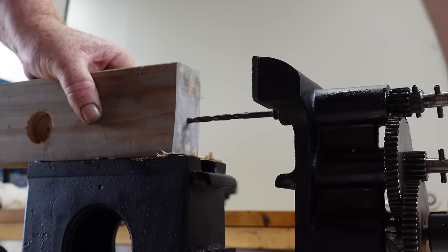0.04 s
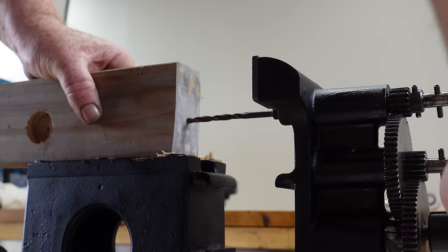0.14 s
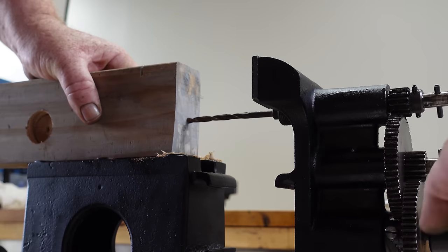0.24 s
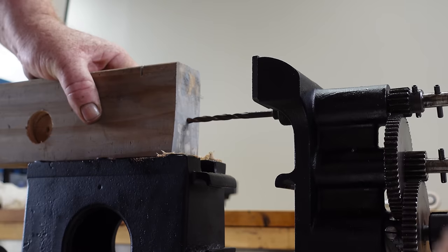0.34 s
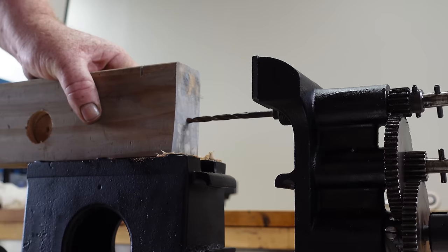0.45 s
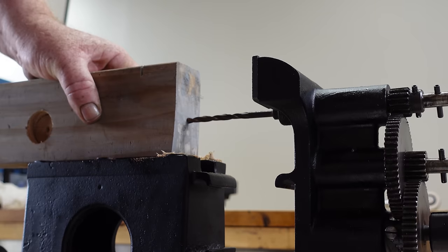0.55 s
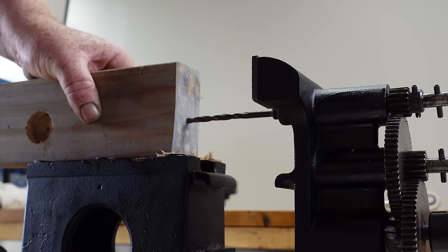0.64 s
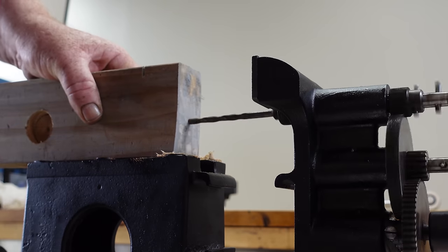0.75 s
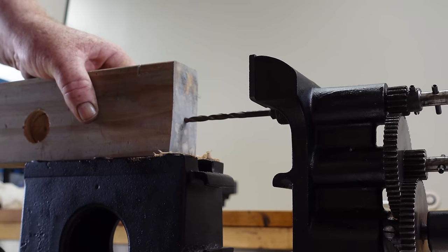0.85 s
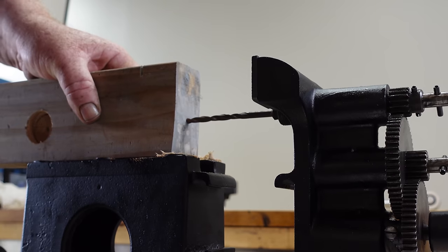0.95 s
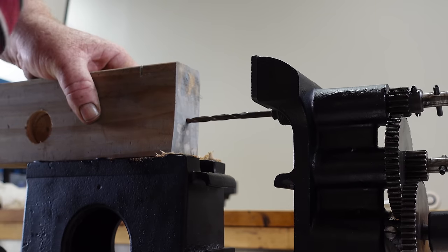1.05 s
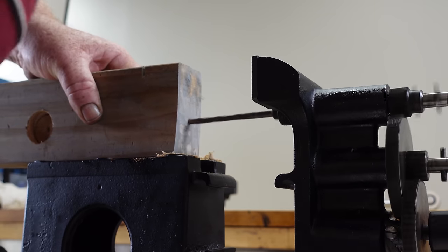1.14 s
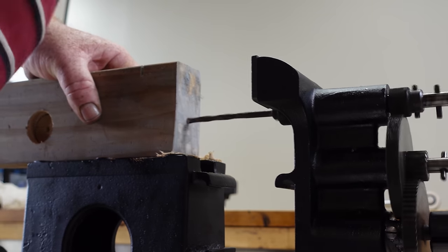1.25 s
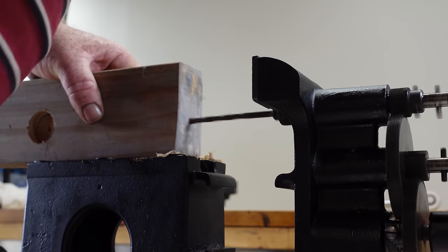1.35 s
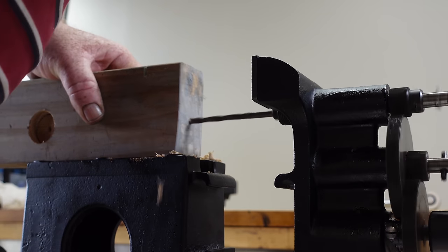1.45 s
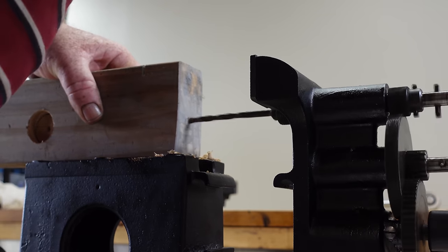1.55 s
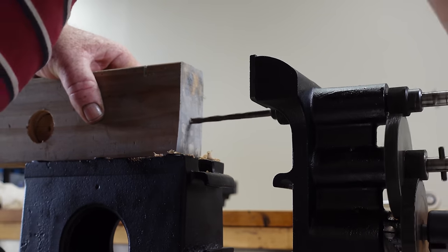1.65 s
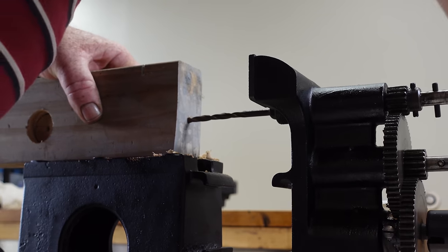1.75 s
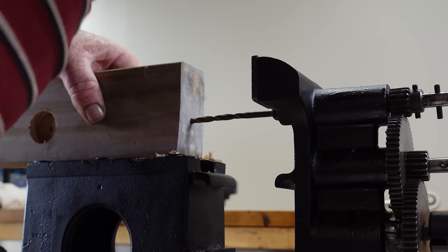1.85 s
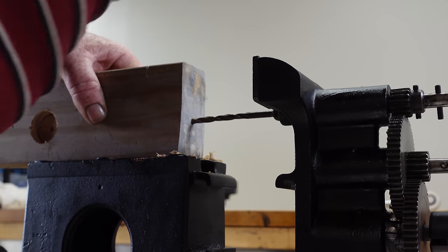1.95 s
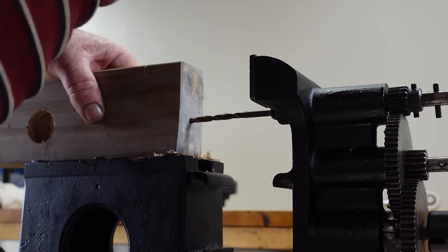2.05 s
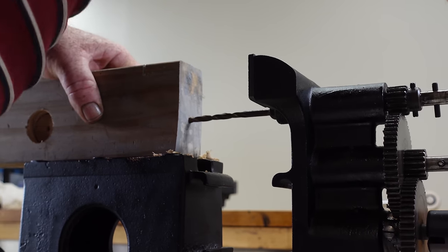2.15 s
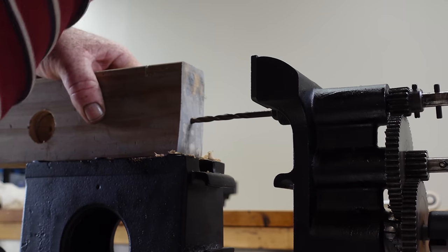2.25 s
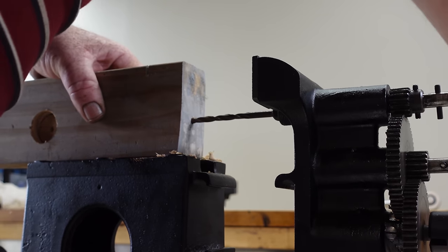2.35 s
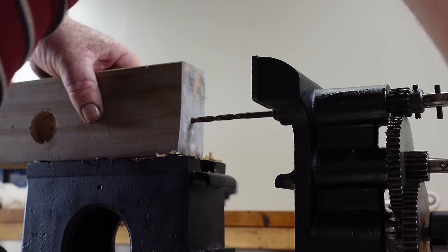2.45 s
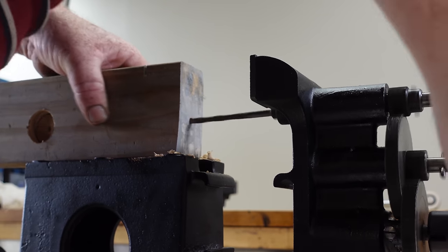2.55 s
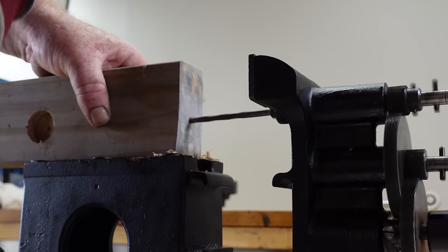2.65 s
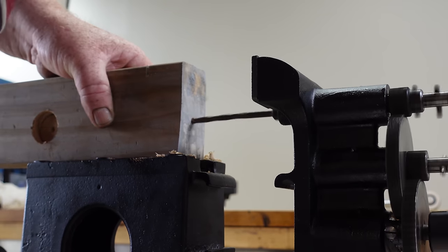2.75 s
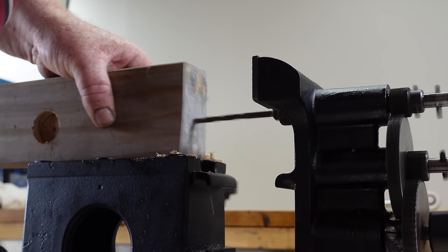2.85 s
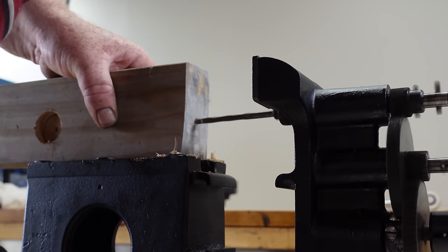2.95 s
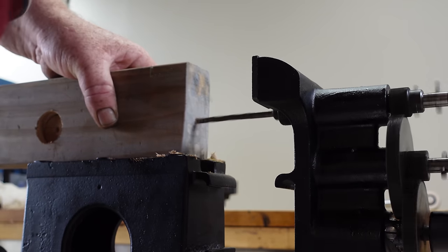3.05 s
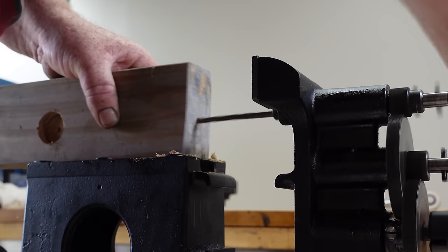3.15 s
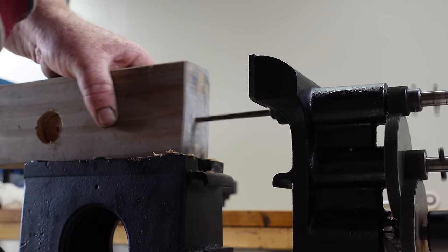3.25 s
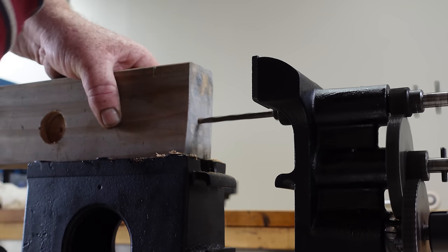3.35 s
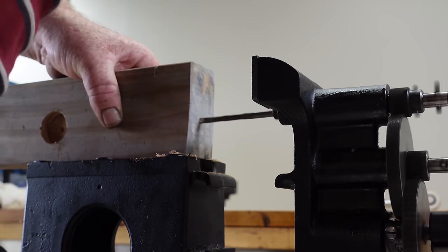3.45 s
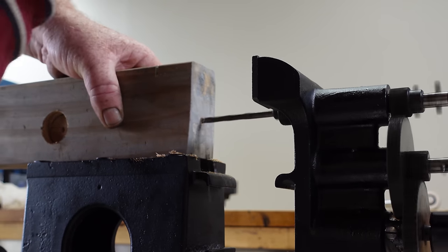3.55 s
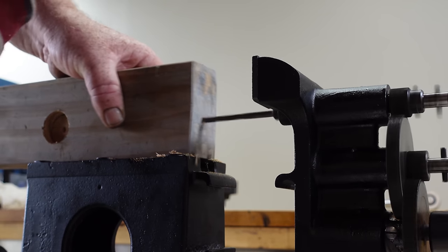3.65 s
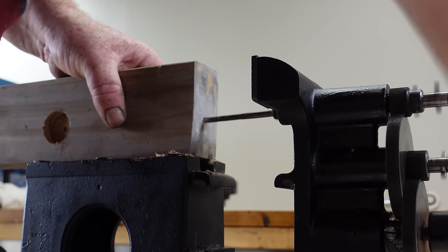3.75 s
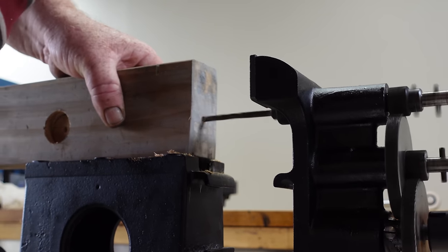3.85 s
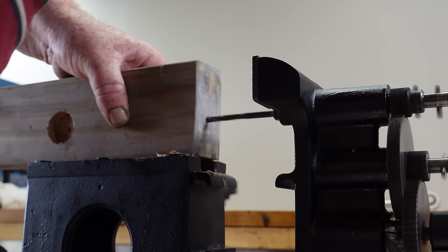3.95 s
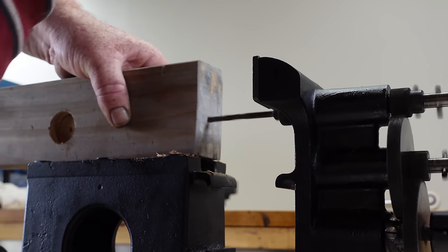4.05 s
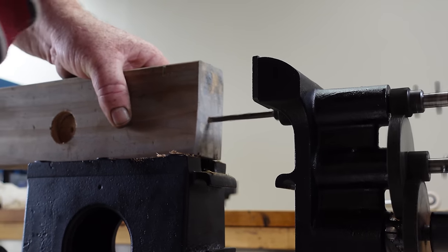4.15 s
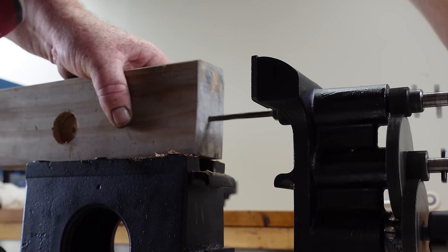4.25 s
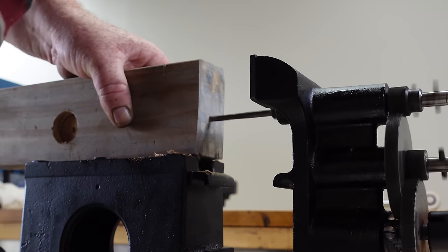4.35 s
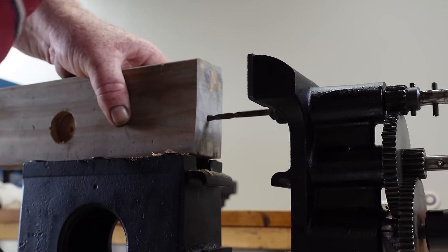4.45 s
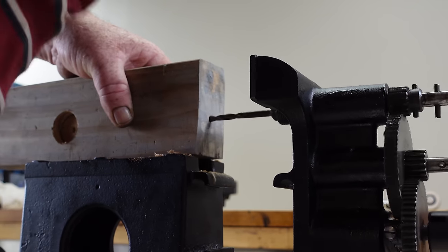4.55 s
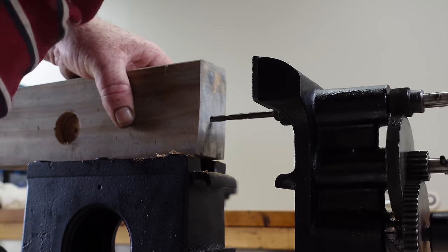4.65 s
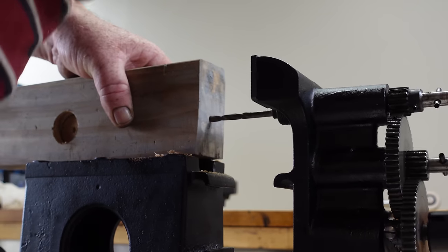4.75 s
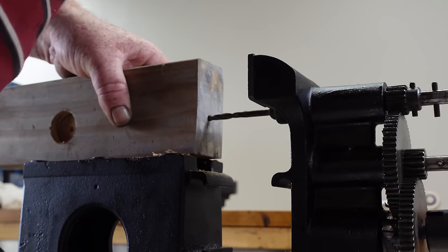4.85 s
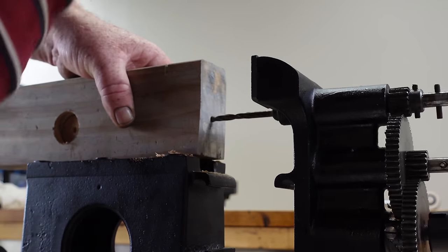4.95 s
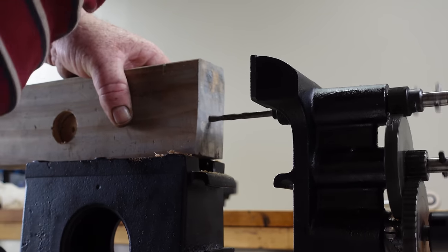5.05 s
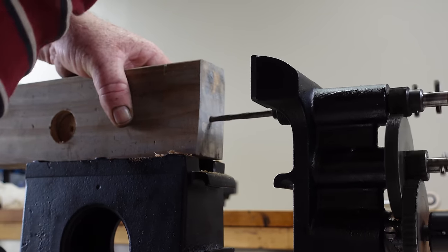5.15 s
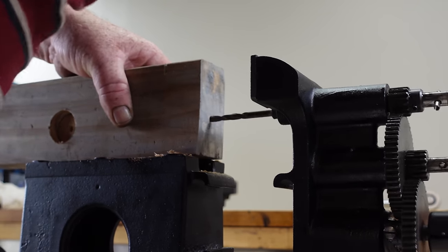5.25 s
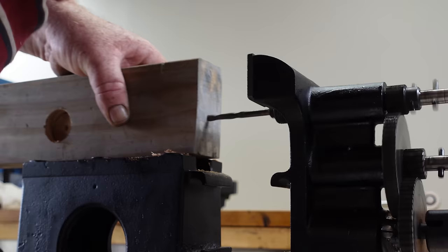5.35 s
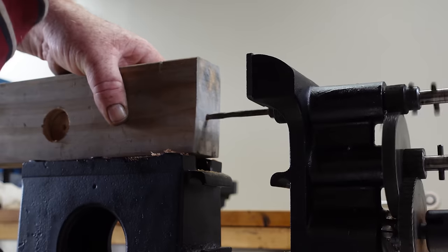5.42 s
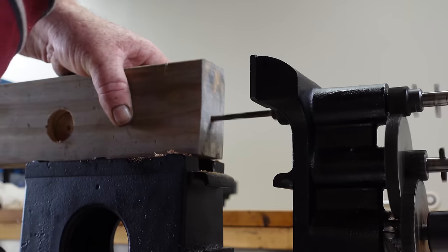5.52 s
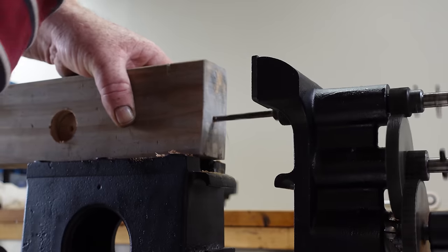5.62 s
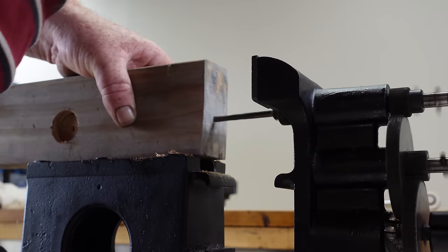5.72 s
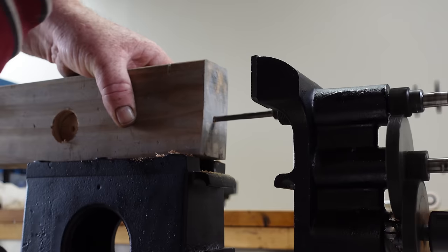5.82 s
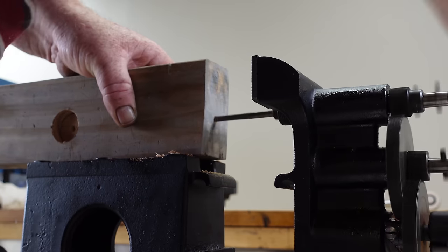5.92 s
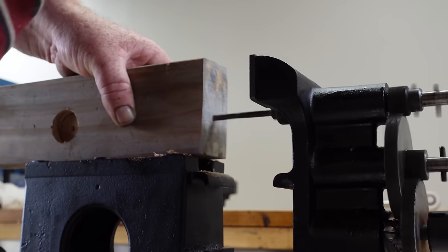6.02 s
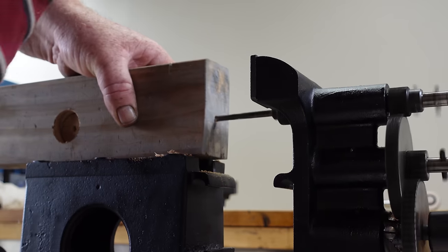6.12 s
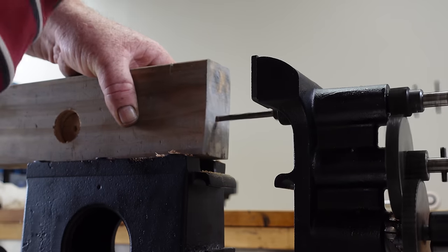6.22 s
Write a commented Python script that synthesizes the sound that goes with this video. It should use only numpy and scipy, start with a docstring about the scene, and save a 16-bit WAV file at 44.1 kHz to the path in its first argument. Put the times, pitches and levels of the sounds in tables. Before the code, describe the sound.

Iron gears grind and clack in three uneven bursts as a hand drill is cranked and its bit catches in wood with small knocks. The first burst is short and softer, the second is the longest, and the last carries a brief metal ring. Loose parts click and tick before and between the turns. It is heard from nearby, near the centre, in a small, quiet workshop with a low hum and soft hiss.

```python
"""Hand drill in a wooden block

A hand-cranked gear train drives a bit in a small workshop. Teeth grind and clack, exciting
the modes of the iron frame and steel wheels; the block knocks as the bit catches.
Loose parts tick, mostly between turns, and the big wheel rings when tapped.
Behind lie short wall reverberation and a low hum and soft hiss that duck briefly once."""
import sys
import numpy as np
from scipy import signal
from scipy.fft import rfft, irfft, next_fast_len
from scipy.io import wavfile
from scipy.ndimage import uniform_filter1d, map_coordinates

SR = 44100
rng = np.random.default_rng(int(sys.argv[2]) if len(sys.argv) > 2 else 0)


def store_pcm(level_fs):
    """Save levels as 16-bit WAV."""
    pcm = np.round(np.clip(level_fs, -1, 1) * 32767).astype(np.int16)
    wavfile.write(sys.argv[1], SR, np.atleast_2d(pcm).T)


N = 276948

# wooden block: (frequency [Hz], width [Hz], gain [dB])
BLOCK_MODES = [(330, 120, -25.5), (501, 430, -7.5), (795, 45, -9), (1067, 1400, 4.5)]
# big wheel, low mode first: (frequency [Hz], gain [dB], free t60 [s])
BIG_WHEEL_MODES = [(2640, -3, .35), (10150, 0, .18), (10235, -2, .18)]


def amp(db):
    return 10 ** (np.asarray(db) / 20)


def unit(x):
    return x / np.sqrt(np.mean(x ** 2) + 1e-20)


def add_at(out, start_s, x):
    out[round(start_s * SR):][:len(x)] += x


def along(points, hz):
    """Interpolate (frequency [Hz], value) points on a log axis."""
    f, v = np.transpose(points)
    return np.interp(np.log(hz + 1), np.log(f + 1), v)


def curves(spans):
    """Per-sample curve of each column after the time."""
    times_s, *columns = np.transpose(np.vstack(spans))
    return [np.interp(np.arange(N) / SR, times_s, column) for column in columns]


def gate(spans):
    """1 inside the spans, soft edges."""
    t = np.arange(N) / SR
    return uniform_filter1d(sum((t > rows[0][0]) & (t <= rows[-1][0]) for rows in spans) * 1., 200)


def wobble(rate_hz, size=N):
    """Smooth random curve."""
    knots = rng.standard_normal(int(size * rate_hz / SR) + 4)
    return map_coordinates(knots, [np.arange(size) * rate_hz / SR])


def filtered(x, response):
    """Apply a complex frequency response."""
    size = next_fast_len(N + SR // 2)
    return irfft(rfft(x, size) * response(np.fft.rfftfreq(size, 1 / SR)), size)[..., :N]


def min_phase(points, hz):
    """Causal response through (frequency [Hz], gain [dB]) points."""
    cepstrum = irfft(np.log(amp(np.maximum(along(points, hz), -70))))
    half = len(cepstrum) // 2
    cepstrum[1:half] *= 2
    cepstrum[half + 1:] = 0
    return np.exp(rfft(cepstrum))


def resonance(f, centre_hz, width_hz):
    return 1j * f * width_hz / (centre_hz ** 2 - f * f + 1j * f * width_hz)


def body(force, modes, skirt, modes_db):
    """Drive resonances on a broad skirt; mean power gain 1."""
    def response(f):
        peaks = sum(amp(db) * resonance(f, hz, width_hz) for hz, width_hz, db in modes)
        gain = min_phase(skirt, f) * (1 + amp(modes_db) * peaks)
        return gain / np.sqrt(np.mean(abs(gain) ** 2))
    return filtered(force, response)


def small_radiator(x):
    """Small parts radiate little bass."""
    return filtered(x, lambda hz: (1j * hz / (1j * hz + 220)) ** 2)


def grit(per_s, spread_db):
    """Dense random contacts of unequal size, rms 1."""
    size = np.minimum(rng.exponential(size=N), 3.5)
    return unit((rng.random(N) < per_s / SR) * rng.standard_normal(N) * amp(spread_db * size))


def blows(times_s, energies_db, rise_s, decay_s, centres_hz=None):
    """Short noise bursts, white or centred on a pitch."""
    out, t = np.zeros(N + SR), np.arange(SR // 16) / SR
    envelope = (1 - np.exp(-t / rise_s)) * np.exp(-t / decay_s)
    noise = rng.standard_normal((len(times_s), len(t)))
    if centres_hz is not None:
        roughness = 1.17 + unit(uniform_filter1d(noise, size=45))
        noise = roughness * np.sin(2 * np.pi * np.outer(centres_hz, t))
    for start_s, db, burst in zip(times_s, energies_db, envelope * noise):
        add_at(out, start_s, amp(db) * burst / np.linalg.norm(burst))
    return out[:N]


def background_noise():
    """Low room hum and soft hiss, swelling with the first tick's tail and the drill's dying tail."""
    # background noise, briefly ducked near 4.9 s as by a gain control or noise gate:
    # one span of (time [s], low band level [dB], high band level [dB])
    levels = [
        [(0, -74, -67), (.04, -50, -52), (.21, -73, -67), (.47, -70.5, -72.5), (.75, -67.5, -66.5),
         (1.17, -65.5, -68), (2.1, -65.5, -66), (2.4, -67.5, -64), (4.55, -68.5, -54.5), (4.65, -63.5, -61.5),
         (4.89, -95, -84.5), (5.05, -75.5, -70.5)],
    ]
    # (frequency [Hz], gain [dB])
    spectrum = [(15, -81), (25, -61), (134, -13.5), (180, -23.5), (285, -0.5), (489, -13), (560, -13),
                (818, -16.5), (1400, -13.5), (1790, -16), (4740, -31.5), (6380, -27.5), (16000, -38.5)]
    low_db, high_db = curves(levels)
    hum_mid, hum_side, hiss_mid, hiss_side = rng.standard_normal((4, N))
    sides, split_hz = np.array([[1], [-1]]), 2200
    hum = filtered(hum_mid + 0.37 * sides * hum_side,
                   lambda hz: amp(along(spectrum, hz)) / (1 + (hz / split_hz) ** 6))
    hiss = filtered(hiss_mid + 0.48 * sides * hiss_side,
                    lambda hz: amp(along(spectrum, hz)) / (1 + (split_hz / (hz + 1)) ** 6))
    return amp(low_db + 6.5) * unit(hum) + amp(high_db - 5) * unit(hiss)


def walls(x):
    """Reverberation; a fresh tail every quarter second as hands and parts move."""
    # room decay: (frequency [Hz], t60 [s])
    decay = [(200, 0.35), (530, 0.43), (1400, 0.3), (3700, 0.31), (9700, 0.25)]
    out, step, delay_samples = np.zeros((2, N + SR)), SR // 4, 200
    for start in range(0, N, step):
        hz, t, noise = signal.stft(rng.standard_normal((2, SR // 2)), SR, nperseg=256)
        mid, side = signal.istft(noise * amp(-60 * t / along(decay, hz)[:, None]), SR, nperseg=256)[1]
        tail = mid + 0.58 * np.array([[1], [-1]]) * side
        wet = signal.fftconvolve(x[None, start:start + step], tail / np.linalg.norm(tail[0]), axes=1)
        out[:, start + delay_samples:][:, :wet.shape[1]] += wet
    return out[:, :N]


def ticks():
    """Loose parts strike: a pitched snap, a noisy crack, a thud in the block."""
    # (time [s], level [dB], pitch [Hz], length [cycles], crack and thud offset [dB])
    strikes = [(.016, -44.5, 3060, 14, -13), (0.0246, -30, 2780, 2.2, -24), (0.0336, -12, 2600, 1.56, -18),
               (0.0345, -20.5, 5470, 2.4, -27), (0.037, -18.5, 3340, 2.3, -25),
               (.3644, -46.5, 6550, 1.2, -11.5), (.473, -38, 3350, 2.3, -32), (0.5532, -49, 2020, 2, -20),
               (0.56, -62, 7200, 1.8, 6), (0.622, -28, 2600, 0.86, -31), (.763, -52, 2550, 12, -1),
               (.7797, -40, 3500, 2.8, -6.5), (.831, -38.5, 2200, 1.2, 2.5),
               (1.044, -37.5, 1290, 0.52, -14), (1.1225, -14, 2610, .64, -23.5),
               (1.936, -49, 11000, 1.5, -11), (1.9756, -43.5, 7000, 1.7, -6),
               (2.0268, -30.5, 6240, 8.4, -3.5), (2.271, -53, 3650, 2.1, -2), (2.311, -43.5, 1570, 1.7, -4),
               (2.379, -26.5, 6540, 2, -16.5), (2.64, -34, 2600, 10.6, -30), (4.589, -37, 11060, 3.2, -9.5),
               (4.8038, -35.5, 2610, 4.7, -3.5), (4.8136, -27.5, 8820, 2.6, -8.5),
               (4.8383, -13, 2345, 0.72, -22), (4.866, -36.5, 2500, 0.44, -2.5),
               (5.0313, -45, 11160, 2.5, -14.5), (5.042, -34, 2080, 0.84, -10),
               (5.0845, -36.5, 2180, 1.2, -22), (5.3195, -48, 2700, 2.1, -15),
               (5.3289, -27.5, 7500, 1.6, -6), (5.379, -44, 9500, 1.7, 2), (5.4465, -33, 1740, 2.4, -25),
               (5.472, -35, 1750, 6.4, -4), (5.529, -14.5, 2500, 4, -8), (6.155, -15, 1756, 9.9, -26)]
    # (frequency [Hz], gain [dB])
    crack_spectrum = [(300, -57), (1500, 2), (3500, -6.5), (6000, -1.5), (9000, -6.5), (12000, -10),
                      (16000, -32)]
    out, cracks, t = np.zeros(N + SR), np.zeros(N + SR), np.arange(SR // 3) / SR
    thud = sum(amp(db) * np.exp(-np.pi * width_hz * t) * np.sin(2 * np.pi * hz * t)
               for hz, width_hz, db in BLOCK_MODES)
    for start_s, db, hz, cycles, offset_db in strikes:
        age = t * hz / cycles
        snap = (4 * age) ** 2 * np.exp(-3 * age) * np.sin(2 * np.pi * hz * t)
        crack = np.exp(-t / 0.0038) * rng.standard_normal(len(t))
        add_at(out, start_s, amp(db) * (snap + amp(offset_db - 7) * thud))
        add_at(cracks, start_s, amp(db + offset_db + 5) * crack)
    return out[:N] + filtered(cracks[:N], lambda f: min_phase(crack_spectrum, f))


def wheel_taps():
    """The free big wheel rings unsteadily when tapped."""
    # (time [s], level [dB], low mode offset [dB])
    taps = [(1.9747, -71, 2), (2.0277, -56.5, -10), (2.379, -58.5, -11), (2.64, -54, 5), (4.8038, -58, 3),
            (4.813, -56, -14), (4.8385, -55.5, -12), (5.0421, -68.5, -4), (5.328, -54, -12)]
    out, t = np.zeros(N + SR), np.arange(SR // 3) / SR
    for start_s, db, low_db in taps:
        partials = []
        for hz, mode_db, t60_s in BIG_WHEEL_MODES:
            envelope = amp(mode_db - 60 * t / t60_s + 7.3 * wobble(90, size=len(t)))
            partials.append(envelope * np.sin(2 * np.pi * (hz * t + rng.random())))
        add_at(out, start_s, amp(db) * (amp(low_db) * partials[0] + sum(partials[1:])))
    return out[:N]


def iron_pings(t60_s=0.18):
    """Struck iron parts ring on with a rough, fading note."""
    # (time [s], level [dB], pitch [Hz])
    pings = [(.473, -66, 3500), (0.622, -56.5, 3260), (2.38, -63, 2620), (2.641, -48, 2620),
             (4.863, -48, 1378), (5.47, -43, 1730), (6.075, -30.5, 1735), (6.157, -31, 1740)]
    out, t = np.zeros(N + SR), np.arange(SR // 3) / SR
    for start_s, db, hz in pings:
        roughness = 0.93 + wobble(120, size=len(t))
        add_at(out, start_s, amp(db - 60 * t / t60_s) * roughness * np.sin(2 * np.pi * hz * t))
    return out[:N]


def block_knocks():
    """The bit catches; the block answers with a dry push and a short woody note."""
    # (time [s], level [dB], pitch [Hz])
    catches = [(.0335, -31, 687), (1.212, -34, 720), (1.307, -27, 750), (1.365, -28.5, 1080),
               (1.425, -23.5, 1100), (1.48, -36, 794), (1.693, -39, 734), (2.642, -29, 665),
               (3.014, -31, 850), (3.041, -25.5, 710), (3.167, -29, 1160), (3.287, -24, 1200),
               (3.618, -24.5, 780), (3.686, -25.5, 580), (3.716, -21.5, 1190), (3.743, -17, 790),
               (3.805, -25, 1180), (4.118, -27, 790), (4.167, -17, 940), (4.231, -18.5, 790),
               (4.26, -19, 736), (4.287, -19.5, 797), (4.811, -43.5, 797), (5.097, -33.5, 810),
               (5.184, -25.5, 840), (5.477, -38.5, 736), (5.533, -33, 700), (5.589, -22, 960),
               (5.64, -20.5, 770), (5.683, -19, 700), (5.729, -20, 765), (5.777, -20, 840),
               (5.823, -18.5, 835), (5.863, -18.5, 720), (5.899, -18.5, 760), (5.93, -13, 1234),
               (5.959, -18.5, 784), (5.989, -17.5, 940), (6.235, -28.5, 810)]
    out, t = np.zeros(N + SR), np.arange(SR // 16) / SR
    for start_s, db, hz in catches:
        push_hz = hz * rng.uniform(1.177, 1.677)
        push = rng.uniform(0.44, 0.94) * np.sin(2 * np.pi * push_hz * t) * np.exp(-t / 0.0014)
        note = np.sin(2 * np.pi * hz * t) * np.exp(-t / 0.0029) * (1 - np.exp(-t / 0.0012))
        add_at(out, start_s, amp(db + 5.5) * (note + push))
    return out[:N]


def bit_rasp(rise_s=0.026, fall_s=0.0091):
    """The slowly turning bit rasps in fine, bright grains."""
    # (peak time [s], level [dB])
    swells = [(5.134, -47.5), (5.223, -46)]
    t = np.arange(N) / SR
    envelope = sum(amp(db) * np.exp(-np.maximum((peak_s - t) / rise_s, (t - peak_s) / fall_s))
                   for peak_s, db in swells)
    grains = filtered(grit(503, spread_db=7), lambda f: resonance(f, 5400, 1900) ** 2)
    return envelope * unit(grains)


def tooth_contacts(wheel_db, turning, light_per_s=14):
    """Hard contacts, about one per pinion turn, plus light ones at random."""
    # (time [s], level [dB], frame pitch [Hz])
    hard = [(1.196, -31, 1570), (1.208, -22, 1675), (1.243, -22.5, 1590), (1.29, -31, 1640),
            (1.3678, -26, 1280), (1.3883, -22, 1264), (1.428, -22.5, 1593), (1.488, -22, 1603),
            (1.629, -31.5, 1590), (1.669, -31, 1640), (2.594, -37, 1650), (2.6422, -25.5, 1240),
            (2.6827, -33, 1620), (2.7102, -21.5, 1686), (2.826, -25.5, 1770), (2.893, -25, 1600),
            (2.9442, -24, 1503), (2.9997, -21, 1810), (3.047, -26, 1330), (3.0874, -17.5, 1560),
            (3.1272, -7.5, 1605), (3.1593, -10.5, 1413), (3.1921, -8.5, 1380), (3.2194, -8, 1557),
            (3.2549, -11, 1510), (3.294, -16.5, 1617), (3.3303, -17.5, 1710), (3.3753, -23, 1590),
            (3.422, -21.5, 1636), (3.459, -27.5, 1840), (3.491, -21.5, 1477), (3.5344, -25.5, 2010),
            (3.6666, -21, 1960), (3.6796, -15, 1354), (3.714, -10, 1440), (3.7423, -8, 1374),
            (3.771, -16.5, 1330), (3.801, -12.5, 1310), (3.8386, -15, 1500), (3.8778, -15, 1714),
            (3.903, -18, 1790), (3.936, -19.5, 1630), (3.9562, -19, 1625), (3.9944, -23.5, 1710),
            (4.086, -21.5, 1504), (4.134, -20.5, 1920), (4.1742, -25, 1380), (4.2098, -18, 1546),
            (4.2411, -7, 1230), (4.2673, -8.5, 1350), (4.298, -8, 1408), (4.3673, -16.5, 1567),
            (4.4058, -16, 1615), (5.5315, -20, 1320), (5.5741, -25, 1726), (5.641, -23.5, 1346),
            (5.8244, -23.5, 1610), (5.864, -20, 1684), (5.8981, -14, 1670), (5.9334, -7, 1400),
            (5.9621, -8, 1273), (5.9968, -19.5, 1730), (6.0346, -26, 1660), (6.071, -16.5, 1760),
            (6.1083, -15.5, 1695), (6.1563, -10.5, 1787), (6.2193, -23, 2000)]
    when, size, tone = rng.random((round(light_per_s * N / SR), 3)).T
    at = (when * N).astype(int)
    idle = turning[at] < .5
    light_db = wheel_db[at] + 13.5 + 3 * (2 * size - 1) - 80 * idle
    light_hz = 1446 + 426 * tone
    return np.hstack([np.transpose(hard), [at / SR, light_db, light_hz]])


def steel_wheels(grind, times_s, contact_db):
    """Grind, tooth strikes and flank slides drive the wheels; meshing damps the big wheel's ring."""
    # (frequency [Hz], width [Hz], gain [dB])
    modes = [(4720, 300, 0), (5500, 400, -3), (6320, 300, 4), (8840, 350, 3), (9280, 300, 2)]
    # broad radiation: (frequency [Hz], gain [dB])
    skirt = [(1880, -32), (3200, -3), (4160, -6.5), (4630, -4.5), (6190, -3), (6850, -5), (7890, -5),
             (8910, -6.5), (10400, -5.5), (16000, -27)]
    strikes = blows(times_s, contact_db + 7.5, rise_s=0.0002, decay_s=0.0008)
    slides = blows(times_s, contact_db + 10.5, rise_s=0.00046, decay_s=0.0088)
    force = grind + strikes + slides

    def damped_ring(f, damping=3):
        return sum(amp(db) * resonance(f, hz, damping * np.log(1000) / (np.pi * t60_s))
                   for hz, db, t60_s in BIG_WHEEL_MODES[1:])
    return body(force, modes, skirt, modes_db=-2) + amp(11) * filtered(force, damped_ring)


def iron_frame(grind, times_s, contact_db, pitch_hz, lag_s=0.0058):
    """The frame carries the grind and shudders just after each contact."""
    # (frequency [Hz], width [Hz], gain [dB])
    modes = [(1241, 120, 1), (1360, 91, 0), (1370, 23, -10), (1557, 39, -6.5), (1600, 170, -2.5),
             (1753, 18, 0), (1854, 26, -3), (1952, 33, 3), (2128, 35, -22.5), (2215, 83, -13),
             (2416, 150, -16), (2565, 210, -7.5)]
    # broad radiation: (frequency [Hz], gain [dB])
    skirt = [(600, -37), (1000, -15.5), (1300, -4), (1700, -1), (2100, 0), (2700, -4.5), (3600, -8),
             (5000, -38.5)]
    shudder_db = 0.79 * contact_db - 2.46
    shudders = blows(times_s + lag_s, shudder_db, rise_s=0.0013, decay_s=0.0065, centres_hz=pitch_hz)
    return body(grind + shudders, modes, skirt, modes_db=6)


def bit_bite(bite_db, turning):
    """The cutting bit excites the block and shakes the bench."""
    # bench under the drill: (frequency [Hz], gain [dB])
    skirt = [(15, -77.5), (25, -43), (147, -24), (300, -3.5), (460, -1.5), (523, -5.5), (740, -4),
             (1100, -8.5), (1430, -20.5), (2420, -120)]
    force = turning * amp(bite_db + 2.62 * wobble(30)) * grit(1500, spread_db=1.5)
    shake = unit(filtered(rng.standard_normal(N), lambda f: 1 / (1 + (f / 110) ** 2)))
    return body(force, BLOCK_MODES, skirt, modes_db=-4) + turning * amp(bite_db - 32.5) * shake


def hand_drill():
    """The crank grinds the gears under an uneven tooth load and drives the bit."""
    # spans of cranking, rows of (time [s], grind level [dB], bite level [dB])
    cranking = [
        [(1.18, -42.5, -47), (1.26, -42, -51), (1.4, -41.5, -45), (1.58, -45, -53), (1.73, -45, -56),
         (1.8, -58, -58)],
        [(2.585, -50, -47), (2.66, -44.5, -46.5), (2.8, -40.5, -54), (3.045, -37.5, -49), (3.19, -31, -38),
         (3.45, -36.5, -47.5), (3.6, -34.5, -47), (3.78, -30.5, -44), (4.06, -38, -45.5), (4.29, -29, -36.5),
         (4.415, -34, -43.5), (4.47, -42.5, -55)],
        [(4.8, -53, -63), (4.88, -56, -51), (4.93, -60, -70)],
        [(5.035, -72, -76), (5.1, -48.5, -52.5), (5.24, -52, -61), (5.3, -67.5, -86), (5.42, -52, -77),
         (5.47, -47, -64), (5.53, -35, -42), (5.7, -36, -47.5), (5.87, -33, -44), (6.03, -32, -38),
         (6.17, -37, -44), (6.28, -33.5, -44)],
    ]
    grind_db, bite_db = curves(cranking)
    turning = gate(cranking)
    wheel_db = -43.5 + 1.17 * (grind_db + 39)  # swings wider than the frame's level
    times_s, contact_db, pitch_hz = tooth_contacts(wheel_db, turning)
    load = wobble(45)
    wheel_grind = turning * amp(wheel_db - 2 + 1.5 * load) * grit(2500, spread_db=1.5)
    wheels = steel_wheels(wheel_grind, times_s, contact_db)
    frame_grind = turning * amp(grind_db + 2 * load) * grit(1500, spread_db=1)
    frame = iron_frame(frame_grind, times_s, contact_db, pitch_hz)
    return wheels + frame + bit_bite(bite_db, turning)


def scene():
    """Drill and block near centre, loose parts slightly right, in the room."""
    drill = hand_drill() + bit_rasp()
    wood = small_radiator(block_knocks())
    parts = small_radiator(ticks() + wheel_taps() + iron_pings())
    direct = (drill + wood) * amp([[-.1], [.1]]) + parts * amp([[-.8], [.8]])
    return direct + walls(amp(-5) * drill + amp(-3.5) * (wood + parts)) + background_noise()


def record(dry):
    """Band-limited stereo microphone; its close ports narrow the bass."""
    low_hz, top_hz = 70, 15800
    mid, side = dry[0] + dry[1], dry[0] - dry[1]
    side = filtered(side, lambda hz: 1 - .5 / (1 + (hz / 500) ** 2))
    stereo = np.array([mid + side, mid - side]) / 2
    return filtered(stereo, lambda hz: 1j * hz / (1j * hz + low_hz) * (hz < top_hz))


dry = scene()
out = record(dry)
store_pcm(out)
```